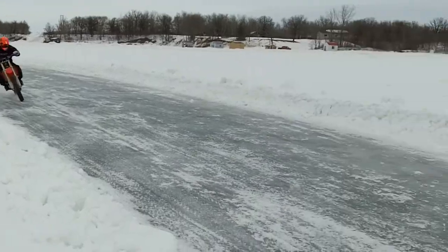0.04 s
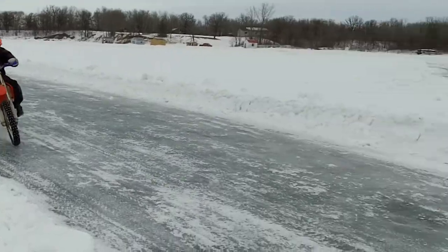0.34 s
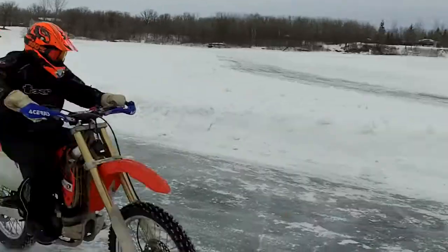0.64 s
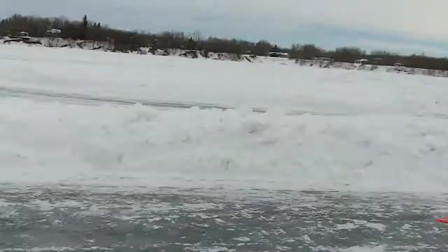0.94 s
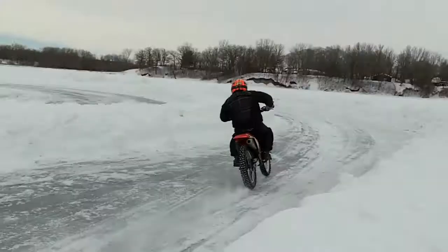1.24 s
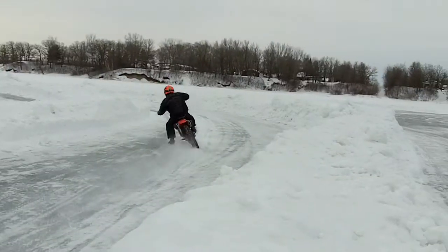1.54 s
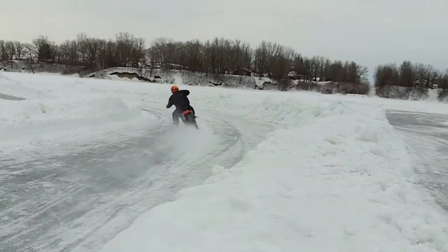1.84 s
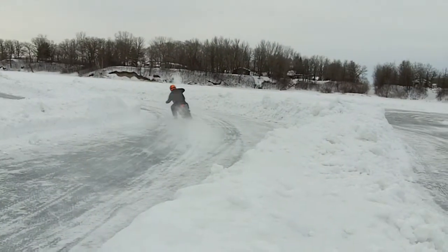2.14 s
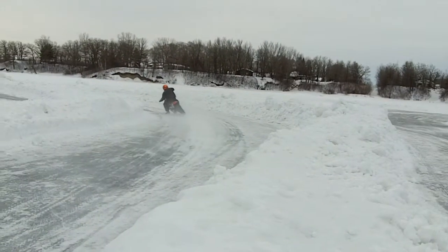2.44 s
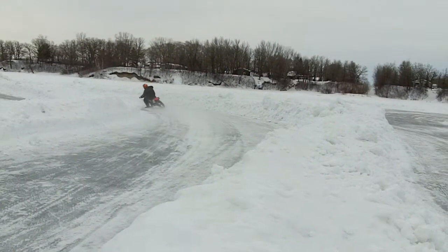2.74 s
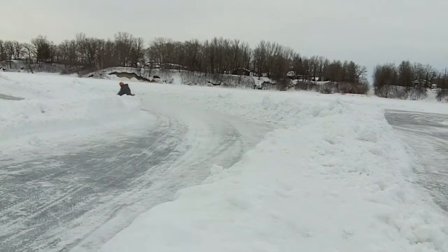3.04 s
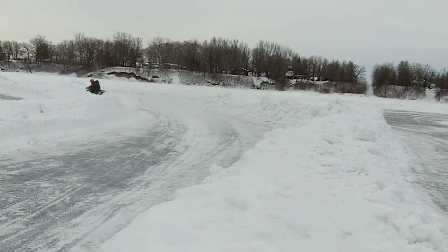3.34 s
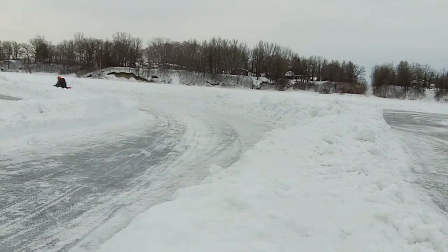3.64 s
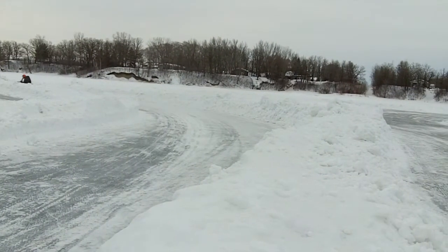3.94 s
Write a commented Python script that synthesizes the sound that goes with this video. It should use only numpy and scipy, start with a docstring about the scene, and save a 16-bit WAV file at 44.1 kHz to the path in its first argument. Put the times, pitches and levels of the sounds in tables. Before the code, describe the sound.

A motorcycle thumps past with tyres scraping ice, backfires and accelerates away as wind buffets.

```python
"""A one-cylinder dirt bike passes close on an ice track, each firing booming in its exhaust.
Its studded tyres scrape and spray ice, while wind buffets the microphone throughout.
From about 1.2 s it coasts into the bend and unburnt fuel pops. Near 2 s it speeds up again,
then leaves with a hard crackle. From 2.8 s a second bike drones further off, slowing as it nears."""
import sys
import numpy as np
from scipy import signal
from scipy.fft import rfft, irfft, next_fast_len
from scipy.io import wavfile
from scipy.ndimage import map_coordinates

SR = 44100
rng = np.random.default_rng(int(sys.argv[2]) if len(sys.argv) > 2 else 0)


def store_pcm(level_fs):
    """Save levels as 16-bit WAV."""
    pcm = np.round(np.clip(level_fs, -1, 1) * 32767).astype(np.int16)
    wavfile.write(sys.argv[1], SR, np.atleast_2d(pcm).T)


N = 176400

# The first bike's engine speed. Each row: time in seconds, firings per second.
FIRING_RATE = [(0.0, 49.51), (0.25, 48.72), (0.61, 47.35), (0.79, 48.12), (1.12, 41.0), (1.2, 41.03),
               (1.38, 35.32), (1.62, 31.44), (1.8, 31.13), (2.09, 37.25), (2.17, 41.65), (2.24, 40.21),
               (2.68, 42.16), (2.98, 41.56), (3.05, 43.02), (3.24, 49.08), (3.5, 46.48), (3.77, 50.13),
               (4.0, 54.33)]
# How loudly the tyres scrape. Each row: time in seconds, level in dB.
TYRE_LEVEL = [(0, -38), (.15, -44.5), (.32, -33.5), (.5, -30), (.72, -30), (.87, -35), (1, -40),
              (1.25, -43.5), (1.8, -46.5), (2.2, -47.5), (2.5, -46), (2.85, -45.5), (3.45, -47.5),
              (3.72, -41), (3.84, -37), (4, -32)]


def amp(db):
    """Turn decibels into a multiplier."""
    return 10 ** (np.asarray(db) / 20)


def unit(x):
    """Scale x to an average (rms) level of 1."""
    return x / np.sqrt(np.mean(x ** 2) + 1e-20)


def curve(rows, t=None):
    """Join (seconds, value) points with lines; read them at times t, or at every sample."""
    return np.interp(np.arange(N) / SR if t is None else t, *np.transpose(rows))


def wobble(rate):
    """A smooth curve through `rate` random values a second."""
    return map_coordinates(rng.standard_normal(int(N * rate / SR) + 4), [np.arange(N) * rate / SR])


def filtered(x, response):
    """Multiply each frequency in x by response(frequency)."""
    size = next_fast_len(N + SR // 2)
    return irfft(rfft(x, size) * response(np.fft.rfftfreq(size, 1 / SR)), size)[:N]


def coloured(x, colour):
    """Shape the tone of x. Each row of a colour: frequency in Hz, gain in dB."""
    f, db = np.transpose(colour)
    return filtered(x, lambda hz: amp(np.interp(np.log(hz + 1), np.log(f), db)))


def noise(colour):
    """Noise with the given tone, at level 1."""
    return unit(coloured(rng.standard_normal(N), colour))


def echoed(x, gain, delay_s):
    """x with one short reflection."""
    return filtered(x, lambda f: 1 + gain * np.exp(-2j * np.pi * f * delay_s))


def add(track, start_s, sound):
    """Mix a short sound into the track."""
    i = int(np.clip(start_s * SR, 0, N))
    track[i:i + len(sound)] += sound[:N - i]


def cycles(rate):
    """Engine cycles completed at each sample."""
    return np.cumsum(curve(rate)) / SR


def firing_times():
    """When the first bike fires, in seconds: once a cycle."""
    return np.flatnonzero(np.diff(np.floor(cycles(FIRING_RATE)))) / SR


def surge(depth):
    """A gain that swells and sinks once per firing."""
    return 1 + depth * np.cos(2 * np.pi * (cycles(FIRING_RATE) - .15))


def thumps(times, db, modes, scatter_db, puff_s=0.0012, lag_s=0.00019):
    """Soft puffs of gas make the exhaust ring at its natural notes (modes)."""
    def response(f):
        ring = sum(amp(gain_db) * 1j * f * width / (hz * hz - f * f + 1j * f * width)
                   for hz, width, gain_db in modes)
        softened = ring / (1 + (2 * np.pi * f * puff_s) ** 2)
        return -softened / np.abs(irfft(softened)).max()
    sizes = amp(db + scatter_db * rng.standard_normal(len(times)))
    kicks = np.bincount(((times + lag_s) * SR).astype(int), sizes, N)[:N]
    return filtered(kicks, response)


def cracks(times, db, ring_hz, rise_s=0.00018, ring_s=0.00046, rasp_s=0.00086, tail_s=0.0057):
    """Shock waves leave the pipe: a brief ring and a rasp of gas, made hollow by a reflection."""
    # Each row: frequency in Hz, gain in dB.
    crack_colour = [(200, -43), (780, 12), (1100, 0.5), (1600, 6), (3500, 1.5), (7000, 0), (10000, -13.5),
                    (14000, -33.5)]
    out, t = np.zeros(N), np.arange(SR // 40) / SR
    high_pass = signal.butter(2, 1300, "high", fs=SR)
    rise = 1 - np.exp(-(t / rise_s) ** 2)
    gas_fade = 0.61 * np.exp(-t / rasp_s) + 0.073 * np.exp(-t / tail_s)
    for start, level, hz in zip(times, db, ring_hz):
        ring = -np.sin(2 * np.pi * hz * t) * np.exp(-t / ring_s) * rise
        rasp = signal.lfilter(*high_pass, rng.standard_normal(len(t)) * gas_fade * rise)
        add(out, start + .0008, amp(level) * (ring + rasp))
    return coloured(echoed(out, gain=0.13, delay_s=0.001188), crack_colour)


def exhaust():
    """Every firing booms in the silencer; throttle adds the pipe's note and a crack."""
    # The silencer's boom and the pipe's note. Each row: time in seconds, level in dB.
    boom_level = [(0, -27), (.18, -19.5), (.33, -16), (.55, -15), (.7, -14.5), (.78, -22.5), (.92, -16.5),
                  (1.03, -23.5), (1.2, -18.5), (1.35, -22.5), (1.8, -27.5), (2.1, -22), (2.3, -62),
                  (3, -65), (4, -41)]
    pipe_level = [(0, -29), (.85, -21.5), (1.3, -37), (1.8, -58), (1.95, -23.5), (2.35, -14.5),
                  (2.62, -12.5), (2.8, -20), (3.03, -13), (3.28, -17), (3.5, -29.5)]
    # The notes they ring at. Each row: frequency in Hz, width in Hz, gain in dB.
    silencer_modes = [(85, 21, -16), (140.4, 36.4, 5.5), (296, 26, -5.5)]
    pipe_modes = [(66.6, 49, -2), (200, 108, -2), (340, 190, 1.5), (490, 370, -7.5), (860, 230, -13)]
    # The firings' sharp edge. Each row: time in seconds, level in dB, ring pitch in Hz.
    crack_shape = [(0, -55, 1490), (.36, -38, 1520), (.7, -27, 1500), (.87, -21.5, 1590), (1.15, -22, 1300),
                   (1.25, -30, 1520), (2.25, -41, 1580), (2.42, -25.5, 1530), (2.9, -32, 1690),
                   (2.995, -13, 1750), (3.19, -15, 1810), (3.31, -14, 2400), (3.42, -11.5, 3740),
                   (3.52, -17.5, 2060), (3.74, -16, 2320), (4, -18.5, 2520)]
    times = firing_times()
    row_times, db, hz = np.transpose(crack_shape)
    level_scatter, pitch_scatter = rng.uniform(-1, 1, (len(times), 2)).T
    boom = thumps(times, curve(boom_level, times), silencer_modes, scatter_db=.7)
    pipe = thumps(times, curve(pipe_level, times), pipe_modes, scatter_db=.8)
    pipe = echoed(pipe, gain=0.22, delay_s=0.00535)  # each puff returns from the pipe's far end
    crack_db = np.interp(times, row_times, db) + 4.5 * level_scatter
    ring_hz = np.interp(times, row_times, hz) * np.exp(.3 * pitch_scatter)
    return boom + pipe + cracks(times, crack_db, ring_hz)


def tyres():
    """Studs scrape the ice in fine grains, pulsing with each firing."""
    # Each row: frequency in Hz, gain in dB.
    scrape_colour = [(150, 5), (400, 1), (800, -3), (1400, 3.5), (2200, -0.5), (3200, -5), (4500, -8),
                     (6500, -3), (9000, -17.5), (12000, -22.5), (15000, -38)]
    scrape = noise(scrape_colour) * amp(1.5 * wobble(900))
    return amp(curve(TYRE_LEVEL)) * unit(scrape * surge(depth=0.15))


def engine_rush():
    """The engine's hollow, pulsing rush, heard from the side and behind."""
    # Each row: time in seconds, level in dB.
    rush_level = [(0, -30.5), (.62, -64), (.74, -26), (.87, -33), (.98, -34.5), (1.06, -29.5),
                  (1.15, -28.5), (1.28, -72), (2, -42.5), (2.5, -37), (3.3, -34), (3.6, -38), (4, -33)]
    # Each row: frequency in Hz, gain in dB.
    rush_colour = [(120, 9.5), (370, -0.5), (450, 2), (600, -2.5), (850, -7.5), (1400, -9.5), (3000, -74)]
    return amp(curve(rush_level)) * unit(noise(rush_colour) * surge(depth=0.44))


def gears(teeth_per_cycle=10.5, waver_radians=0.59):
    """Gear teeth meet in a wavering whine that stays 17 dB below the tyres."""
    phase = 2 * np.pi * teeth_per_cycle * cycles(FIRING_RATE) + waver_radians * wobble(40)
    whine = sum(np.sin(k * phase) for k in (2, 3, 4, 6))
    return amp(curve(TYRE_LEVEL) - 17) * unit(whine)


def wind():
    """A low, uneven breeze with short gusts that buffet the microphone."""
    # Each row: time in seconds, level in dB.
    breeze_level = [(0, -27), (.5, -32), (1.15, -31.5), (1.65, -23.5), (2.2, -22.5), (2.75, -26), (4, -25)]
    # Each row: middle in seconds, level in dB, half-length in seconds.
    gusts = [(.06, -16.5, .04), (.725, -18, .025), (1.655, -17, .025), (2.12, -19, .07), (2.62, -21, .06),
             (2.93, -17.5, .025), (3.29, -19, .025)]
    # Each row: frequency in Hz, gain in dB.
    breeze_colour = [(3, -6.5), (25, -1.5), (50, -15), (90, -15.5), (300, -29), (3000, -108)]
    gust_colour = [(8, -9), (22, 3.5), (70, -9.5), (120, -16.5), (400, -28.5), (1500, -91)]
    out = amp(curve(breeze_level)) * unit(noise(breeze_colour) * amp(2.5 * wobble(24.98)))
    air, t = noise(gust_colour), np.arange(N) / SR
    for middle, db, half_length in gusts:
        swell = np.exp(-((t - middle) / half_length) ** 2)
        gust = swell * air
        out += amp(db) * gust * np.linalg.norm(swell) / np.linalg.norm(gust)
    return out


def ice_spray(chip_decay_s=0.0055):
    """The rear wheel sprays gritty ice dust, and a few larger chips land."""
    # Each row: time in seconds, level in dB.
    dust_level = [(0, -64), (.6, -40), (.85, -35.5), (1.05, -47.5), (1.6, -51), (1.95, -56), (2.2, -56),
                  (2.52, -45), (2.75, -55.5), (3.3, -78)]
    chip_landings = [(1.714, -33), (1.747, -36.5), (2.102, -37), (2.898, -37.5)]
    # Each row: frequency in Hz, gain in dB.
    ice_colour = [(600, -17), (2000, -0.5), (3300, 9.5), (4600, 7.5), (7000, 9.5), (9000, 1.5),
                  (12000, -10), (15000, -32)]
    dust = unit(noise(ice_colour) * amp(2.3 * wobble(700) + 2.6 * wobble(40.05)))
    chips, t = np.zeros(N), np.arange(SR // 25) / SR
    for start, db in chip_landings:
        add(chips, start, amp(db) * rng.standard_normal(len(t)) * np.exp(-t / chip_decay_s))
    return amp(curve(dust_level)) * dust + coloured(chips, ice_colour)


def exhaust_pops():
    """Unburnt fuel makes the firing nearest each listed time go off much harder."""
    # Each row: time in seconds, crack level in dB, thump level in dB, ring pitch in Hz.
    pops = [(1.198, -20, -33, 880), (1.273, -18.5, -23, 1100), (1.299, -19, -23, 1820),
            (1.353, -18.5, -12, 2190), (1.381, -22, -16.5, 1520), (1.438, -18, -19.5, 2320),
            (1.467, -21.5, -22, 1320), (1.527, -21, -15.5, 2660), (1.557, -23.5, -48, 1360),
            (1.588, -22.5, -26, 1430), (1.652, -28, -20, 1370), (1.874, -43, -16.5, 1210),
            (2.075, -22, -30, 1540), (2.103, -26, -40, 1570), (2.131, -24, -15, 1470),
            (2.350, -14.5, -26.5, 1720), (3.069, -16, -24, 2350), (3.134, -15.5, -41, 1800),
            (3.282, -17.5, -40, 2580), (3.619, -13, -33, 1990)]
    # The thump's low notes. Each row: frequency in Hz, width in Hz, gain in dB.
    pop_modes = [(78, 77, 2.9), (122, 62, 1.1)]
    rough_times, crack_db, thump_db, ring_hz = np.transpose(pops)
    fired = firing_times()
    times = fired[np.abs(fired[:, None] - rough_times).argmin(axis=0)]
    return cracks(times, crack_db, ring_hz) + thumps(times, thump_db, pop_modes, scatter_db=3.5)


def second_bike():
    """A distant engine slows and nears: pure tones at 2, 3, 4 and 5 times its firing rate."""
    # Each row: time in seconds, firings per second, then the four tones' levels in dB.
    drone = [(2.8, 83, -43, -62, -46, -60), (2.98, 82.5, -41, -42, -38, -60),
             (3.15, 81.56, -40, -38.5, -42, -59), (3.331, 82.3, -34, -39.5, -37, -50),
             (3.471, 76.7, -48, -41.5, -45, -62), (3.571, 73.17, -34, -45, -57, -37),
             (3.64, 67.74, -32, -33.5, -52, -41), (3.711, 65.25, -31, -37.5, -50, -38),
             (3.841, 56.43, -37.5, -25, -38.5, -51), (3.96, 48.43, -32, -26.5, -34.5, -58)]
    t, rate, *levels = np.transpose(drone)
    phase = 2 * np.pi * cycles(np.c_[t, rate])
    fade_in = curve([(t[0], 0), (t[1], 1)])
    tones = (amp(curve(np.c_[t, db])) * unit(np.sin(k * phase)) for k, db in enumerate(levels, 2))
    return fade_in * sum(tones)


def scene():
    """Both bikes and the wind on open ice, the same in both channels."""
    first_bike = exhaust() + exhaust_pops() + tyres() + engine_rush() + gears() + ice_spray()
    mono = first_bike + wind() + second_bike()
    return np.array([mono, mono])


def record(dry, notch_hz=5400, width_hz=1650, top_hz=15100):
    """The microphone loses a narrow band of treble and everything above top_hz."""
    def response(f):
        notch = (notch_hz ** 2 - f * f) / (notch_hz ** 2 - f * f + 1j * f * width_hz)
        return notch * (f < top_hz)
    return np.array([filtered(side, response) for side in dry])


dry = scene()
out = record(dry)
store_pcm(out)
```